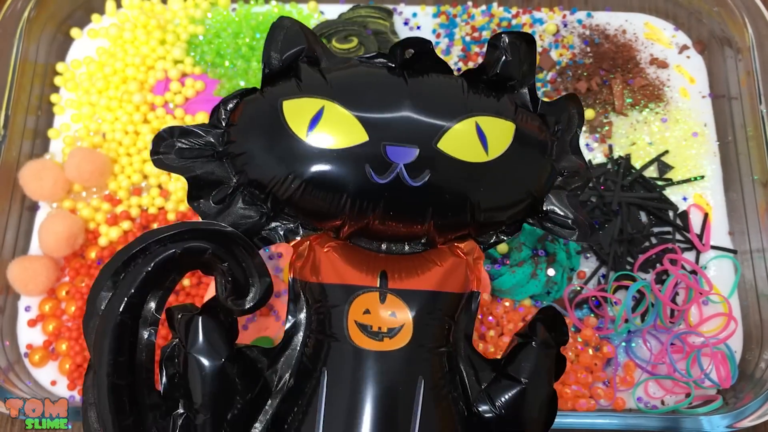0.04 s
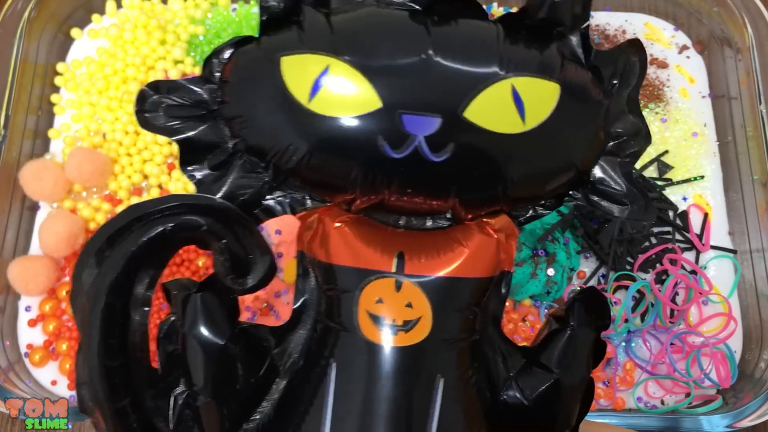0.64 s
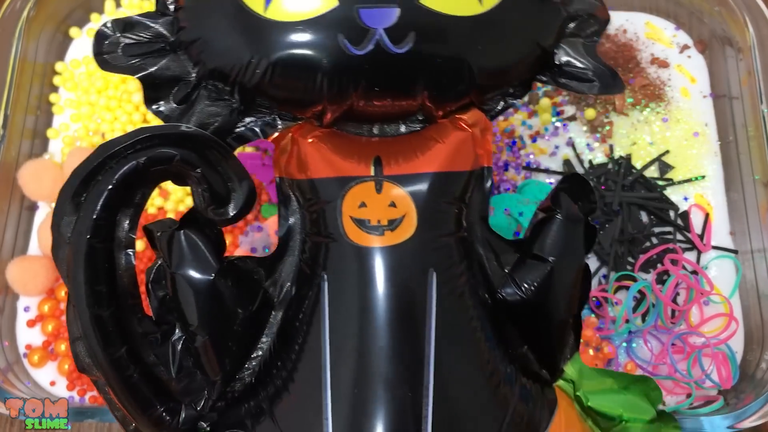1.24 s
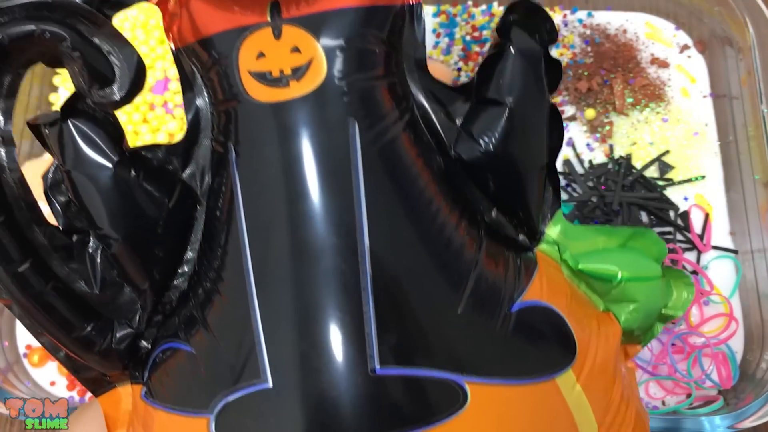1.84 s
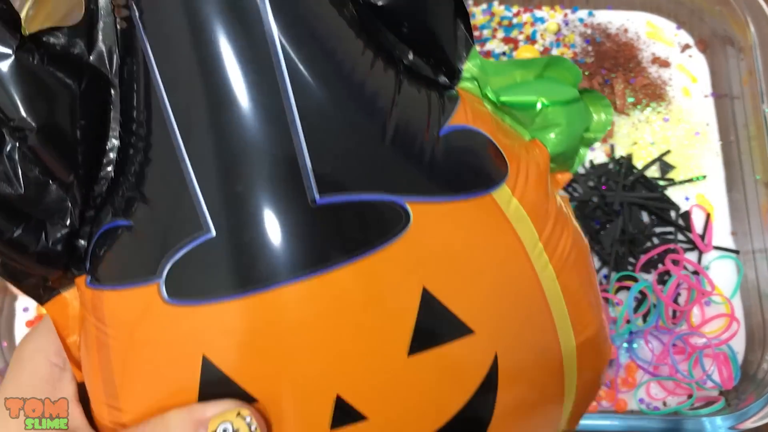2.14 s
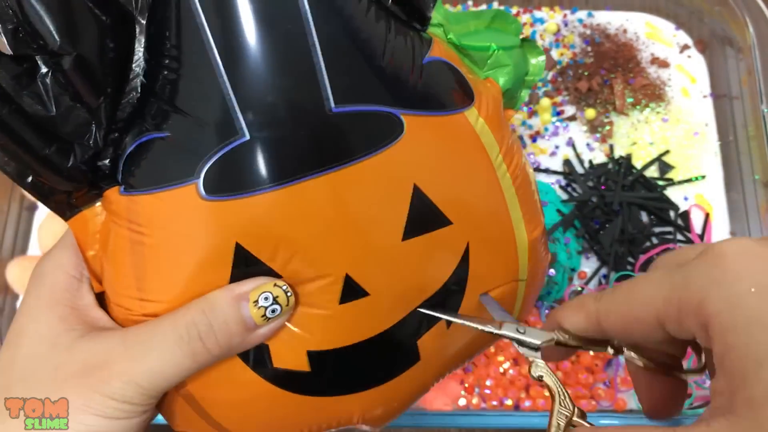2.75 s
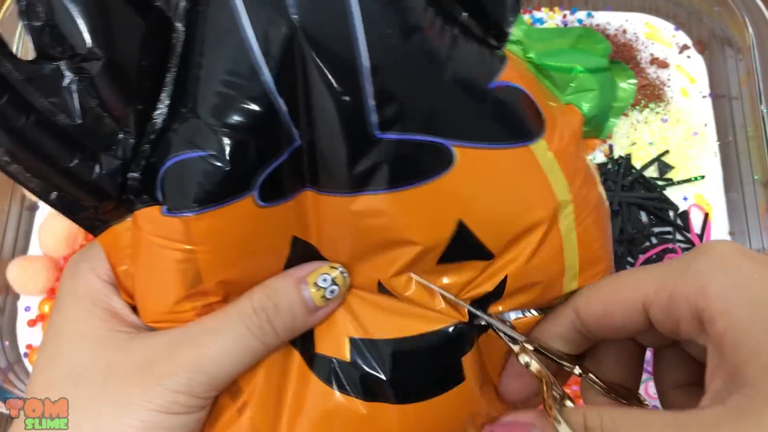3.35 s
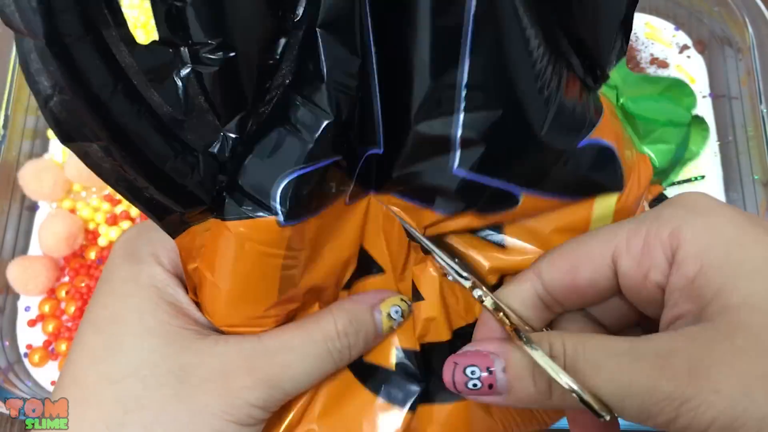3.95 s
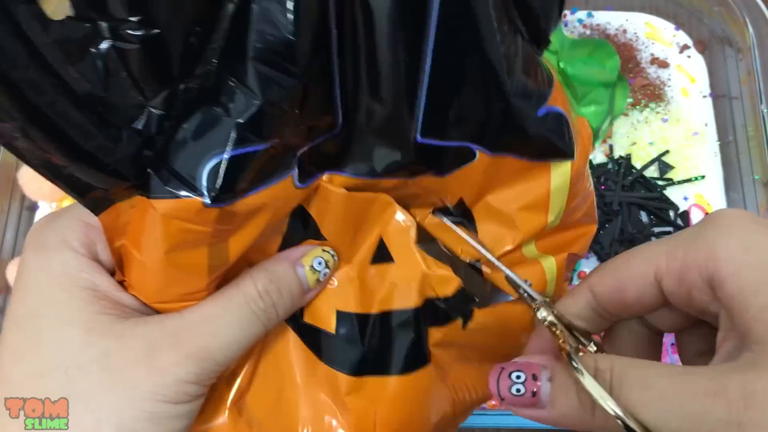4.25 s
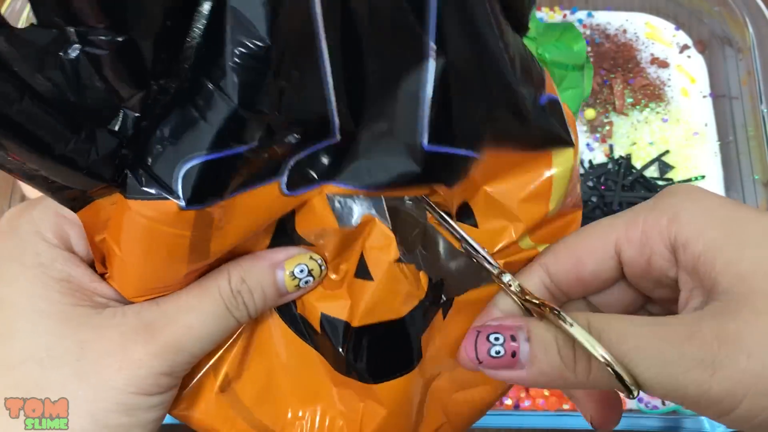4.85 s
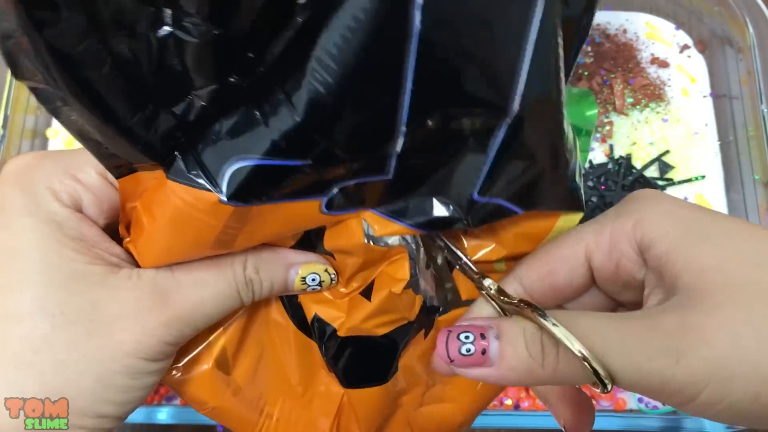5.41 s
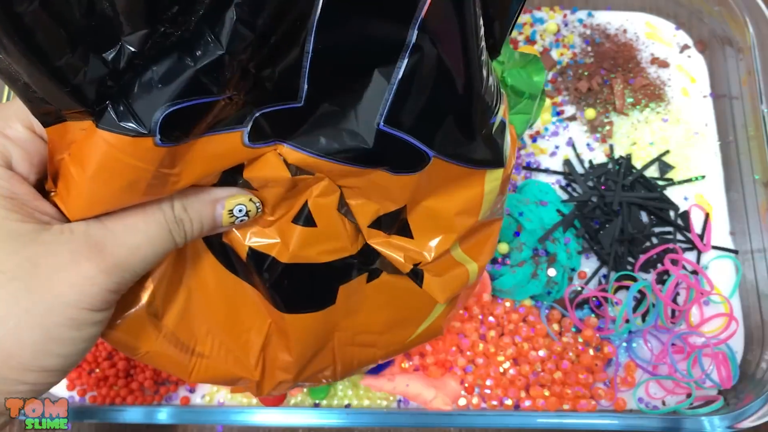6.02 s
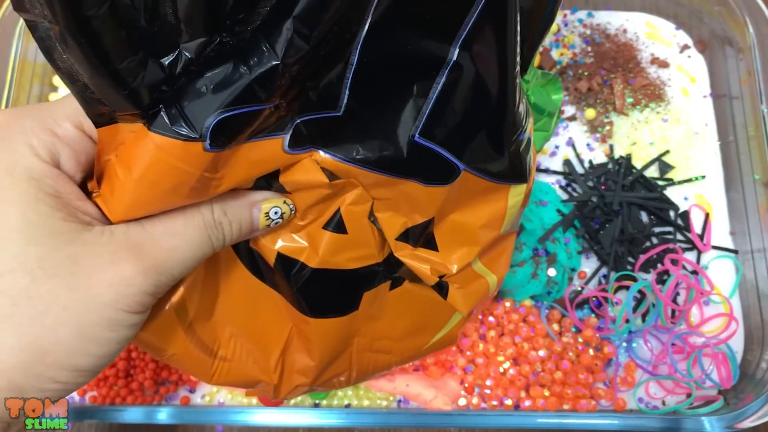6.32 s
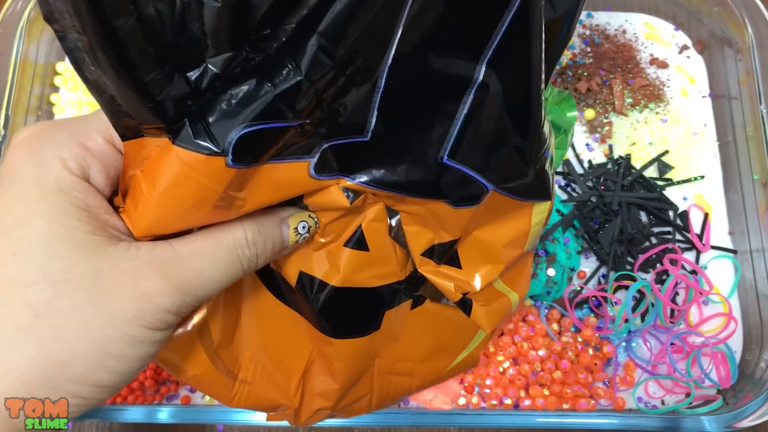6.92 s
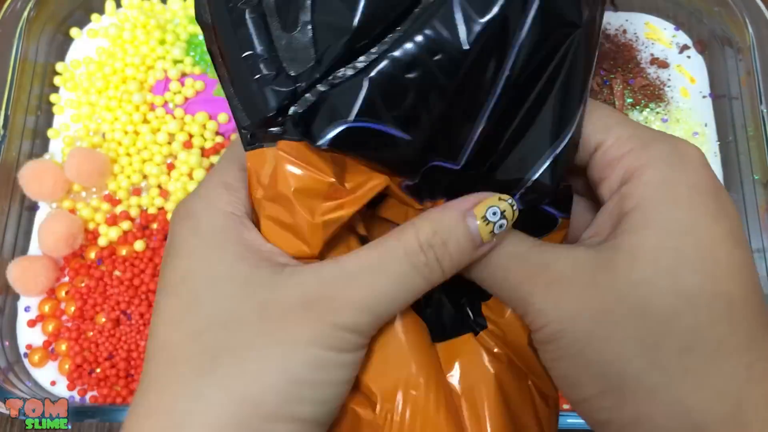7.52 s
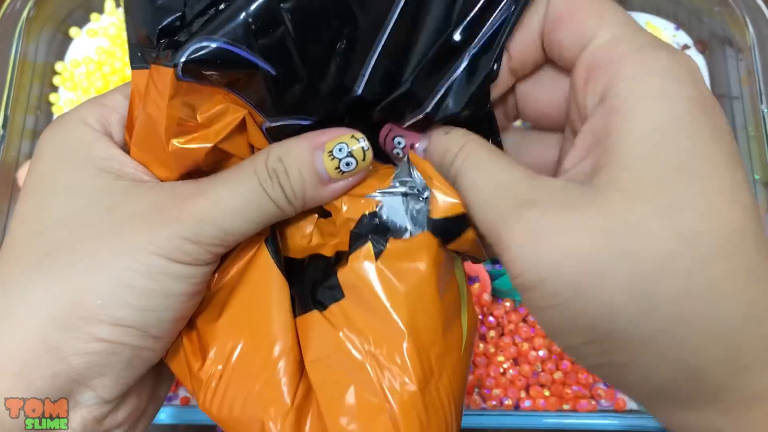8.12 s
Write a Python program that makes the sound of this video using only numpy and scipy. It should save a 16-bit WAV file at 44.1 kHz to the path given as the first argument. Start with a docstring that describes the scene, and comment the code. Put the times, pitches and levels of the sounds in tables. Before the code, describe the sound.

A foil balloon is handled, pricked with a pop and rush of air, then cut with scissors and crumpled, crackling close by.

```python
"""In a quiet room, a full foil balloon slides through someone's hands close by, hissing and bumping.
Scissors clatter off the table, open, and prick the balloon, which pops with a rush of air.
As the slack foil is cut, tiny creases give way in a crackle and large ones flip with a snap.
The scissors scrape and knock as they are laid down, and both hands crumple the foil to a last low flap."""
import sys
import numpy as np
from scipy import signal
from scipy.fft import rfft, irfft
from scipy.io import wavfile
from scipy.ndimage import uniform_filter1d

SR = 44100
rng = np.random.default_rng(int(sys.argv[2]) if len(sys.argv) > 2 else 0)


def digitize_waveform(pressure):
    """Quantize a signal to 16-bit integers and store it at the path in sys.argv[1].

    Rows of a 2-D input are taken as channels; values are limited to [-1, 1].
    """
    field = np.atleast_2d(pressure).T
    bounded = np.clip(field, -1, 1)
    quanta = np.round(bounded * 32767).astype(np.int16)
    wavfile.write(sys.argv[1], SR, quanta)


N = 360297
TIME = np.arange(N) / SR
SHORT = TIME[:8192]   # time axis for one short sound
CUTOFF_HZ = 15900

# Pushes of the scissors through the foil. Each row: when the foil gives in seconds, crackle in dB,
# build-up in seconds, finest crackle in dB, flapping in dB. The levels are relative.
PUSHES = [(3.041, -35.5, 0.021, -46, -31), (3.104, -26.5, 0.015, -30, -29),
          (3.211, -40, 0.024, -34.5, -38.5), (3.334, -35, 0.0078, -41, -39),
          (3.638, -29, 0.086, -34.5, -34.5), (3.713, -31.5, 0.016, -25.5, -27),
          (3.87, -54, 0.073, -41.5, -42.5), (4.02, -38, 0.0089, -35, -43),
          (4.118, -33, 0.063, -37.5, -34.5), (4.204, -28, 0.082, -29.5, -30), (4.392, -38, 0.2, -36, -42.5),
          (4.647, -37, 0.1, -40, -38.5), (4.95, -39.5, 0.078, -34.5, -46), (5.099, -35, 0.065, -33.5, -45),
          (5.241, -41, 0.063, -39.5, -43.5), (5.412, -34, 0.054, -31, -37.5),
          (5.619, -35.5, 0.024, -37.5, -42), (5.825, -37.5, 0.14, -37, -38),
          (6.018, -34.5, 0.05, -33.5, -36.5)]


def from_db(db):
    """Turn decibels into a gain to multiply by."""
    return 10 ** (np.asarray(db) / 20)


def unit(x):
    """Scale a sound to energy 1."""
    return x / np.sqrt(np.sum(x ** 2) + 1e-20)


def at_level(x, db):
    """Give a short sound as much energy as 5 ms of steady sound at this level."""
    return unit(x) * np.sqrt(.005 * SR) * from_db(db)


def at_hz(points, hz):
    """Read between the rows of a table, with frequency spaced in octaves."""
    row_hz, value = np.transpose(points)
    return np.interp(np.log(np.maximum(hz, 1)), np.log(row_hz), value)


def gains(rows):
    """Turn rows of a time and levels into gain curves, silent before and after."""
    times, *columns = np.transpose(rows)
    inside = np.interp(TIME, [times[0] - .01, times[0], times[-1], times[-1] + .01], [0, 1, 1, 0])
    return [inside * from_db(np.interp(TIME, times, db)) for db in columns]


def response(tone, tilt=0, size=4096):
    """Make a filter from a tone table; tilt brightens it, in dB per octave."""
    hz = np.maximum(np.arange(size // 2 + 1) * SR / size, 1)
    db = at_hz(tone, hz) + tilt * np.log2(np.maximum(hz, 500) / 3000)
    db += 18 * np.minimum(np.log2(hz / tone[0][0]), 0)   # fade below the first row
    db -= 20 * np.clip(hz / CUTOFF_HZ - 1, 0, 1)
    cepstrum = irfft(np.log(from_db(db)))[:size // 2]   # keeping half makes the filter start sharply
    return unit(irfft(np.exp(rfft(2 * cepstrum, size))))


def colour(x, impulse):
    """Pass a sound through a filter."""
    return signal.fftconvolve(x, impulse)[:len(x)]


def add(track, start_s, sound):
    """Mix a sound in at the given time."""
    i = int(round(start_s * SR))
    track[i:i + len(sound)] += sound[:N - i]


def dying(decay_s, t=SHORT):
    """Noise that falls to about a third in the given time."""
    return rng.choice([-1, 1], len(t)) * np.exp(-t / decay_s)


def smooth_dying(decay_s):
    """Dying noise, evened out across frequencies: a blow with no pitch of its own."""
    envelope, noise = np.exp(-SHORT / decay_s), dying(decay_s)
    for _ in range(8):
        even = irfft(np.exp(1j * np.angle(rfft(noise))))
        noise = envelope * np.tanh(even / (unit(envelope) + 1e-12))
    return noise


def ring(notes):
    """A struck object rings with a few fading notes."""
    return sum(from_db(db - 60 * SHORT / fade_s) * np.sin(2 * np.pi * hz * SHORT)
               for hz, db, fade_s in notes)


def drift(per_s):
    """A curve that wanders between random values."""
    values = rng.standard_normal(4096)
    return np.interp(TIME * per_s, np.arange(len(values)), values)


def swell(peak_s, rise_s, fall_s):
    """A curve that grows up to one moment and then falls away."""
    return np.exp(-np.maximum((peak_s - TIME) / rise_s, (TIME - peak_s) / fall_s))


def rubbing(tone, rough_db):
    """Rubbing noise that flutters as the surfaces catch."""
    grip = from_db(rough_db * drift(150))
    return colour(unit(rng.standard_normal(N) * grip) * np.sqrt(N), response(tone))


def handling(hiss_db=1.5, bump_s=0.0028):
    """The balloon hisses over the skin; fingers bump it, and the slack foil gives one last low flap."""
    # Each row: fastest moment in seconds, relative level in dB, seconds speeding up, seconds slowing.
    slips = [(0.099, -49.5, 0.0066, 0.024), (0.325, -64, 0.007, 0.0088), (0.57, -54.5, .03, .1),
             (0.743, -46, 0.022, 0.014), (0.8, -51, 0.032, 0.022), (0.955, -54.5, 0.049, 0.044),
             (1.085, -51.5, 0.028, 0.13), (1.373, -45.5, 0.078, 0.016)]
    # Dull bumps; the last is the crumpled foil's flap. Each row: start in seconds, level in dB.
    bumps = [(0.552, -35.5), (0.568, -35.5), (1.0547, -36.5), (1.07, -44), (1.604, -41), (2.745, -37.5),
             (2.761, -39), (8.152, -29.5)]
    # The tone of each sound. Each row: frequency in Hz, relative level in dB.
    hiss_tone = [(120, -1.5), (260, 0), (450, -4.5), (720, -6.5), (1000, -3.5), (1500, -6), (2300, -7),
                 (3500, -12), (4700, -9), (5600, -15.5), (7500, -14), (15000, -23.5)]
    bump_tone = [(60, -14), (170, -2), (300, -7.5), (480, -12.5), (800, -33), (3000, -40), (12000, -74)]
    speed = np.sqrt(sum((from_db(db) * swell(s, rise_s, fall_s)) ** 2 for s, db, rise_s, fall_s in slips))
    out = from_db(hiss_db) * speed * rubbing(hiss_tone, rough_db=2.0)
    for s, db in bumps:
        add(out, s, at_level(colour(dying(bump_s), response(bump_tone)), db))
    return out


def snaps(small_rows, crack_s=0.0013, shiver_s=0.0045, strain_s=0.0018, rise_s=0.00019):
    """A crease strains and flips: it cracks, a flat patch of foil rings, and the sheet shivers."""
    # Large creases and snips. Each row: start in seconds, relative level in dB, tilt in dB per octave.
    large_rows = [(0.0962, -43, -7), (2.745, -42, -2.5), (2.8876, -22.5, 1), (3.0353, -27, -4),
                  (3.0696, -29, -2.5), (3.0983, -23, -2), (3.167, -30, 1), (3.1734, -18, 0),
                  (3.1959, -26, 3.5), (3.2186, -25.5, 1.5), (3.2722, -33, 2), (3.3283, -28.5, -2.5),
                  (3.427, -46, 9), (3.4957, -37, 3), (3.59, -28, 0), (3.6153, -24, 1), (3.623, -22, -1),
                  (3.6318, -32, 2), (3.67, -24, -2.5), (3.6993, -16, -1), (3.7233, -26, -2),
                  (3.767, -16, -2), (3.8901, -35, 0), (3.9969, -27.5, 5.5), (4.1873, -25, 3),
                  (4.2232, -23.5, 0.5), (4.2758, -25, 3), (4.4463, -32, 1.5), (4.5098, -33, 5),
                  (4.5526, -30.5, 0.5), (4.5851, -32, 1.5), (4.641, -37, 4), (4.671, -30, 1.5),
                  (4.7971, -35, 1.5), (4.8911, -30.5, 0.5), (4.9497, -17.5, -0.5), (4.9847, -27.5, 3),
                  (5.353, -34, 0.5), (5.4248, -18.5, 2.5), (5.5315, -34, 1), (5.831, -23.5, 1),
                  (5.8537, -34, 5), (5.9884, -31, 3), (5.9958, -28, 1), (6.205, -40, -1), (6.4323, -46, 0),
                  (6.4593, -39, 1), (6.527, -44.5, 2), (6.5701, -45, 3), (6.6107, -32, 0.5),
                  (7.2935, -43, 3), (7.301, -40.5, 1), (7.3409, -35, 2), (7.4129, -32.5, 0.5),
                  (7.4975, -22, 2), (7.6059, -30, -1.5), (7.6257, -21.5, 2.5), (7.7411, -24, 2),
                  (8.0174, -28.5, -1)]
    # The foil's tone. Each row: frequency in Hz, relative level in dB.
    foil_tone = [(100, -9.5), (290, 0.5), (520, -9.5), (800, -5), (1300, 5), (2200, -2), (3500, -3),
                 (5500, -7.5), (9500, -8), (15500, -14)]
    out = np.zeros(N)
    spreading = 1 - np.exp(-SHORT / rise_s)   # the flip runs along the crease
    for s, db, tilt in list(large_rows) + small_rows:
        foil = response(foil_tone, tilt)
        octaves = 0.71 * tilt + 0.32 * rng.standard_normal()   # brighter: a smaller, higher patch
        hz = min(2594 * 2 ** octaves, CUTOFF_HZ)
        crack = unit(dying(crack_s) * spreading)
        shiver = from_db(-11) * unit(dying(shiver_s))
        patch = from_db(-9) * unit(ring([(hz, 0, 6 / hz)]) * spreading)
        add(out, s, at_level(unit(colour(crack + shiver, foil)) + patch, db + 1))
        strain = colour(dying(strain_s), foil)[::-1]   # swells up to the flip
        add(out, max(s - SHORT[-1], 0), at_level(strain, db - 14)[-round(s * SR):])
    return out


def scissors_on_table(thud_s=0.0234, scatter=0.039):
    """Steel knocks and drags on the hollow table top, which thuds, rings and drones; the steel rings too."""
    # Each row: start in seconds, clatter in dB, its decay in seconds, its tilt in dB per octave,
    # thud in dB, ring of the steel in dB.
    knocks = [(1.722, -32.5, 0.011, 1.5, -65, -67), (1.734, -29.5, 0.0093, -3, -55, -41),
              (1.7547, -18, 0.014, 2, -32, -52), (1.762, -21, 0.006, 0, -23.5, -60),
              (1.773, -53, 0.0061, -7, -42, -70), (1.933, -29.5, 0.013, 0, -39, -22),
              (1.94, -28.5, 0.0075, 1.5, -58, -32), (6.713, -29.5, 0.007, -3.5, -46, -49),
              (6.811, -36, 0.0059, -3, -68, -71), (6.882, -39, 0.0065, 7.5, -88, -70),
              (6.962, -25, 0.0043, -11.5, -42, -67), (6.970, -8.5, 0.0025, 6, -24, -48)]
    # Dragging. Each row: time in seconds, then relative levels of scrape and drone in dB.
    drag = [(6.535, -66, -59), (6.545, -69, -39), (6.59, -59, -44), (6.65, -62, -38), (6.70, -55, -48),
            (6.73, -41, -46), (6.80, -40.5, -58), (6.89, -37, -48), (6.95, -60, -65)]
    # Ringing notes. Each row: pitch in Hz, relative level in dB, seconds to fade by 60 dB.
    table_notes = [(339, -6.5, 0.076), (1170, -7.5, 0.011), (2280, 6.5, 0.0094), (2620, 6, 0.0069),
                   (4100, 5, 0.007), (4540, -4, 0.0051), (7300, -1.5, 0.009)]
    steel_notes = [(10300, -5, 0.0059), (10330, 3, 0.012), (12930, 6, 0.013), (13400, -3, 0.009)]
    # The tone of each sound. Each row: frequency in Hz, relative level in dB.
    clatter_tone = [(90, -6.5), (240, -32), (350, -6), (520, -5), (950, -7.5), (1400, 1), (2700, 2.5),
                    (4000, -2), (5000, -5.5), (7200, -10), (9000, -17), (15500, -27.5)]
    thud_tone = [(45, -6), (105, 8), (200, 0), (350, -4), (600, -3), (2000, -120)]
    scrape_tone = [(700, -4.5), (1900, 3), (3200, -0.5), (5000, -11), (12000, -48)]
    drone_tone = [(260, -9), (335, -3), (430, -11), (550, -16), (800, -30), (2000, -31.5)]
    scrape, drone = gains(drag)
    out = from_db(-1) * scrape * rubbing(scrape_tone, rough_db=6.5)
    out += from_db(-1) * drone * rubbing(drone_tone, rough_db=8.0)
    for s, db, decay_s, tilt, thud_db, ring_db in knocks:
        add(out, s, at_level(colour(smooth_dying(decay_s), response(clatter_tone, tilt)), db))
        # every point of contact loads the table top a little differently
        notes = [(hz * (1 + scatter * rng.standard_normal()), level, fade_s)
                 for hz, level, fade_s in table_notes]
        add(out, s, at_level(ring(notes), db - 4))
        add(out, s, at_level(colour(smooth_dying(thud_s), response(thud_tone)), thud_db))
        add(out, s, at_level(ring(steel_notes), ring_db))
    return out


def blades(rub_s=0.006):
    """The scissors open: steel rubs briefly on steel."""
    # Each row: start in seconds, level in dB.
    rubs = [(2.449, -64), (2.455, -51), (2.4633, -45.5)]
    # The blades' tone. Each row: frequency in Hz, relative level in dB.
    blade_tone = [(2800, -26), (3600, -12), (3950, 4), (4400, -17), (6500, -13), (7600, 6), (8400, -17),
                  (11000, -7), (12000, -15), (13000, -12), (14500, -8)]
    out = np.zeros(N)
    for s, db in rubs:
        add(out, s, at_level(colour(dying(rub_s), response(blade_tone)), db))
    return out


def pops(rush_s=0.083):
    """The tight foil is pricked, then splits with a bang, and air rushes out through the slit."""
    # Each row: start in seconds, bang in dB, its decay in seconds, escaping air in dB.
    stabs = [(2.5508, -38, 0.0052, -59), (2.8317, -8, 0.005, -15)]
    # The burst's tone. Each row: frequency in Hz, relative level in dB.
    burst_tone = [(60, -10.5), (200, 4.5), (400, -2.5), (1000, -6), (1700, -3.5), (2700, -3), (4300, -6.5),
                  (7000, -10.5), (15500, -21)]
    out = np.zeros(N)
    for s, db, decay_s, air_db in stabs:
        bang = colour(smooth_dying(decay_s), response(burst_tone))
        rush = colour(dying(rush_s), response(burst_tone, tilt=0.75))
        add(out, s, at_level(bang, db) + at_level(rush, air_db))
    return out


def cutting(give_s=0.023, settle_s=0.052, settle_share=0.17):
    """Each push loads the foil until it gives and settles. Returns three gain curves for crinkling()."""
    letting_go = np.exp(-np.maximum(TIME - 5.87, 0) / 0.32)
    held = (TIME > 4) * from_db(-50) * letting_go   # the holding hand keeps the slack foil stirring
    power = np.tile(held ** 2, (3, 1))
    for s, db, build_s, fine_db, flap_db in PUSHES:
        push = (1 - settle_share) * swell(s, build_s, give_s) + settle_share * swell(s, build_s, settle_s)
        power += np.outer(from_db([db, fine_db, flap_db]) ** 2, push ** 2)
    return np.sqrt(power)


def crackle(clicks, tone, low_hz, high_hz, decay_s, ring_db, patches=10):
    """Each click lands on one flat patch of foil, which cracks and rings; the level is kept steady."""
    chosen = rng.integers(0, patches, N)
    out, t = np.zeros(N), SHORT[:512]
    for k, hz in enumerate(np.geomspace(low_hz, high_hz, patches)):
        note = np.sin(2 * np.pi * hz * t) * np.exp(-t * hz / 3)
        patch = unit(dying(decay_s, t)) + from_db(ring_db) * unit(note)
        out += signal.oaconvolve(clicks * (chosen == k), patch)[:N]
    out = colour(out, response(tone))
    power = uniform_filter1d(out ** 2, size=3300)
    return out / np.sqrt(np.maximum(power, 1e-12))


def crinkling(drive, spread_db, clump_db, coarse_db, fine_db, flap_db, per_s=1700):
    """Tiny creases give way in clumps, faster as the foil is worked harder, and the whole sheet flaps."""
    # The tone of each layer. Each row: frequency in Hz, relative level in dB.
    coarse_tone = [(250, -25), (520, 0), (760, -0.5), (1250, 1), (2000, 2.5), (3500, -2.5), (4800, -1),
                   (7000, -37), (14000, -14)]
    fine_tone = [(2000, -4.5), (4500, 4.5), (7000, 5), (9700, 2), (11800, -2.5), (13000, 1.5),
                 (16000, -2.5)]
    flap_tone = [(35, -27), (65, -1), (110, -4), (160, -5), (290, -3.5), (420, -6.5), (600, -12),
                 (1200, -29)]
    coarse_gain, fine_gain, flap_gain = drive
    effort = np.sqrt(fine_gain / np.max(fine_gain))
    gives_way = rng.random(N) < per_s * (.15 + effort) / SR
    size_db = spread_db * np.minimum(rng.exponential(1, N), 4) + clump_db * (drift(150) + drift(60))
    clicks = gives_way * from_db(size_db) * rng.choice([-1, 1], N)
    coarse = coarse_gain * crackle(clicks, coarse_tone, 1145, 5440, decay_s=0.00089, ring_db=-6.5)
    fine = fine_gain * crackle(clicks, fine_tone, 7660, 15000, decay_s=0.0013, ring_db=-4.0)
    flap = flap_gain * rubbing(flap_tone, rough_db=6.0)
    return from_db(coarse_db) * coarse + from_db(fine_db) * fine + from_db(flap_db) * flap


def small_snaps(crackle_gain, cut_end_s=6.1, snaps_per_s=12, ticks_per_s=16):
    """Small creases flip by chance: above the crackle while cutting, faintly after. Rows for snaps()."""
    after_cut = TIME > cut_end_s
    per_s = np.where(after_cut, ticks_per_s, snaps_per_s * (TIME > PUSHES[0][0]))
    starts = np.flatnonzero(rng.random(N) < per_s / SR)
    crackle_db = 20 * np.log10(crackle_gain[starts] + 1e-9)
    db = np.where(after_cut[starts], -54.5, crackle_db + 7.5)
    tilt = rng.normal(2.26, 2.06, len(starts))
    return list(zip(starts / SR, db, tilt))


def crumpling(flap_db=-7.5):
    """Both hands give the foil one long squeeze. Returns three gain curves for crinkling()."""
    # Each row: time in seconds, then relative levels of crackle and finest crackle in dB.
    squeeze = [(7.37, -53, -58.5), (7.45, -32, -34.5), (7.53, -30.5, -28), (7.6, -34, -33.5),
               (7.75, -32.5, -35.5), (7.84, -35, -31.5), (7.92, -36.5, -38), (8.03, -39, -34.5),
               (8.1, -42.5, -38.5), (8.165, -33, -32)]
    coarse, fine = gains(squeeze)
    return np.array([coarse, fine, from_db(flap_db) * coarse])


def background(level_db=-57):
    """The quiet room has a faint, low rumble."""
    # Each row: frequency in Hz, relative level in dB.
    rumble_tone = [(44, -8), (54, -4.5), (75, -5), (120, -14.5), (220, -21.5), (500, -30.5), (1400, -33.5),
                   (3000, -38), (8000, -41), (15500, -46.5)]
    return from_db(level_db) * colour(rng.standard_normal(N), response(rumble_tone))


def room(x, build_s=0.0011, bands=11):
    """The room's echo builds up quickly and dies at its own pace in each frequency band."""
    # Each row: frequency in Hz, seconds for the echo to fade by 60 dB.
    fade_times = [(100, 0.63), (260, 0.64), (700, 0.81), (1840, 0.73), (4850, 0.78), (8500, 0.73),
                  (13000, 0.62)]
    # The tone the walls give it. Each row: frequency in Hz, relative level in dB.
    wall_tone = [(60, -14.5), (200, 2), (600, 1), (1200, 2.5), (3000, 0), (5000, -2), (10000, -5.5),
                 (16000, -5)]
    t, tail = TIME[:SR], 0
    edges = np.geomspace(60, 18000, bands + 1)
    for low, high in zip(edges, edges[1:]):
        band_filter = signal.butter(2, [low, high], "band", fs=SR, output="sos")
        band = signal.sosfilt(band_filter, rng.standard_normal(SR))
        tail += band * from_db(-60 * t / at_hz(fade_times, np.sqrt(low * high)))
    tail *= 1 - np.exp(-t / build_s)
    return colour(x, unit(colour(tail, response(wall_tone))))


def scene():
    """The foil is very close; the table lies farther off, so it gets more of the room's echo."""
    cut, squeeze = cutting(), crumpling()
    near = crinkling(cut, spread_db=3.5, clump_db=1.5, coarse_db=0.5, fine_db=-0.2, flap_db=-0.5)
    near += crinkling(squeeze, spread_db=3.0, clump_db=2.0, coarse_db=0.0, fine_db=2.0, flap_db=-1.2)
    near += handling() + blades()
    bang, table, rumble = pops(), scissors_on_table(), background()
    near += snaps(small_snaps(cut[0] + squeeze[0]))
    echo = room(from_db(-15) * near + from_db(-11) * bang + from_db(-8) * table)
    return (near + bang + table + echo + rumble)[None]


def record(dry):
    """Round off the loudest peaks and cut the highest treble."""
    rounded = 1.1 * np.tanh(dry / 1.1)
    return signal.sosfilt(signal.ellip(10, .1, 70, CUTOFF_HZ, fs=SR, output="sos"), rounded)


dry = scene()
out = record(dry)
digitize_waveform(out)
```